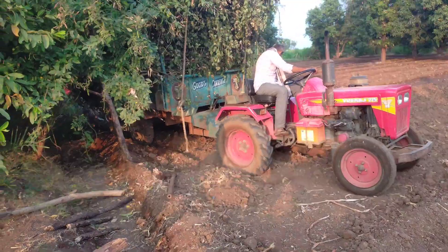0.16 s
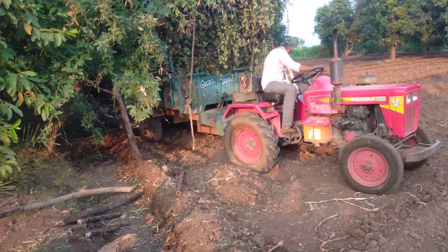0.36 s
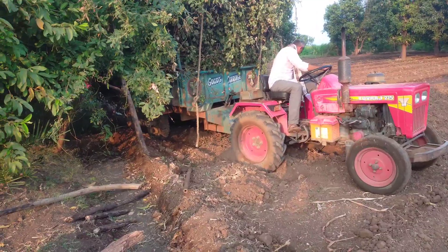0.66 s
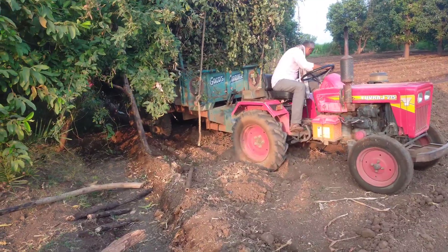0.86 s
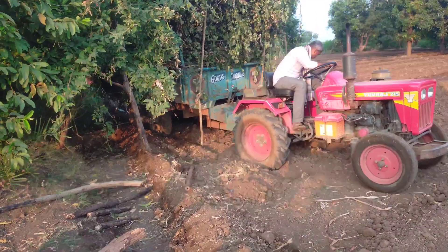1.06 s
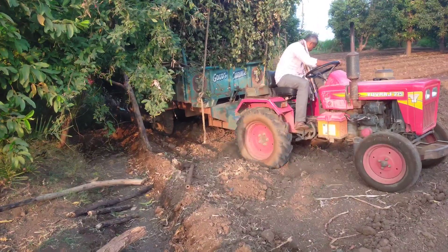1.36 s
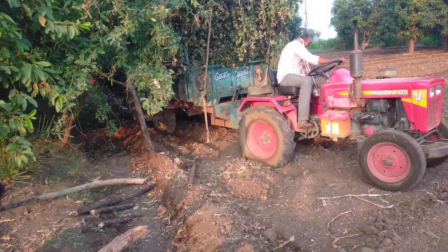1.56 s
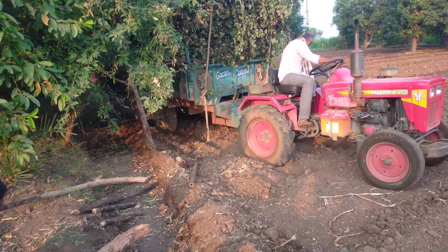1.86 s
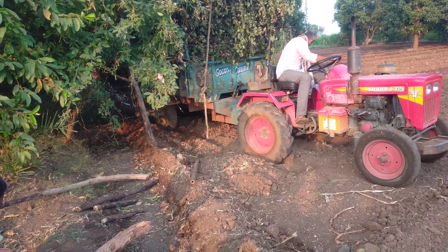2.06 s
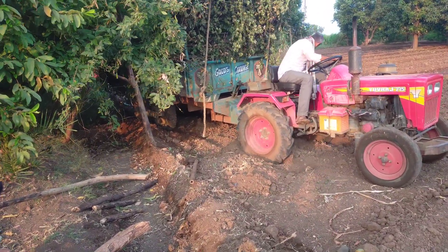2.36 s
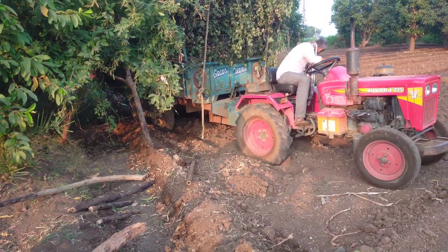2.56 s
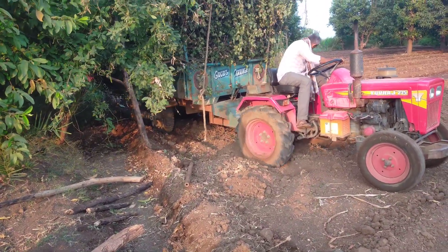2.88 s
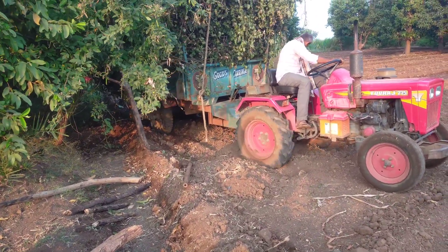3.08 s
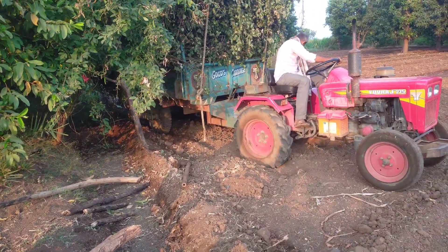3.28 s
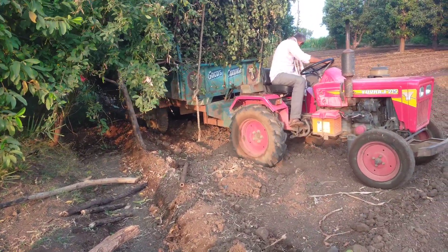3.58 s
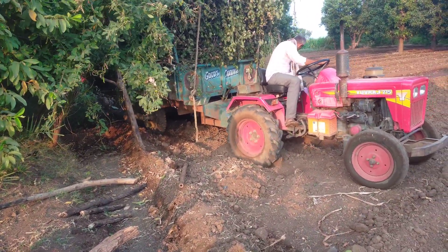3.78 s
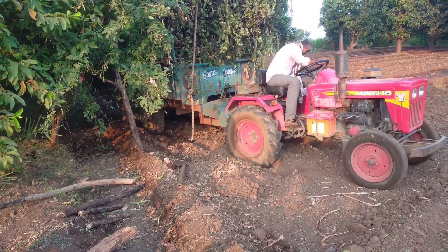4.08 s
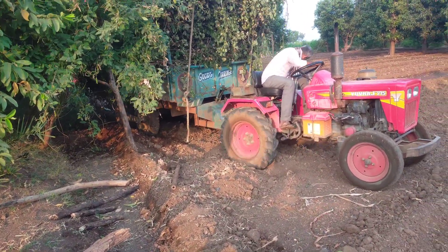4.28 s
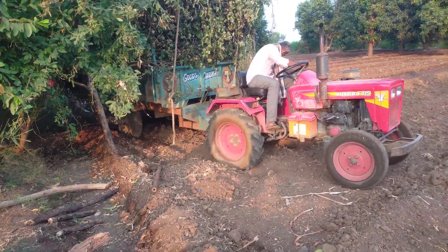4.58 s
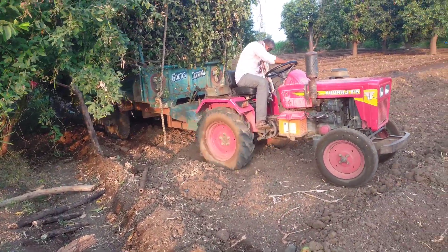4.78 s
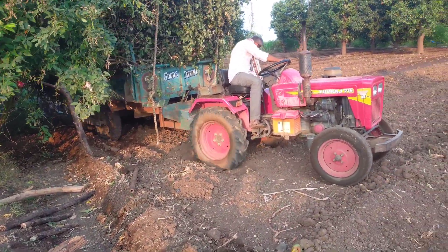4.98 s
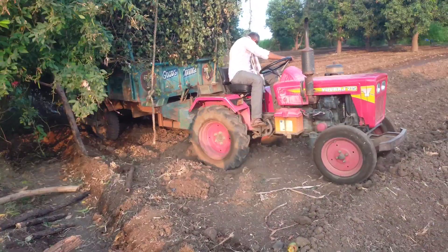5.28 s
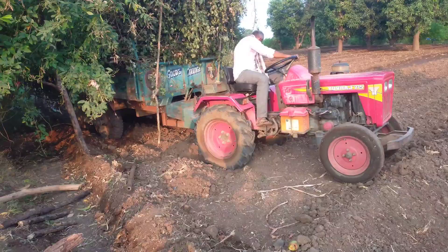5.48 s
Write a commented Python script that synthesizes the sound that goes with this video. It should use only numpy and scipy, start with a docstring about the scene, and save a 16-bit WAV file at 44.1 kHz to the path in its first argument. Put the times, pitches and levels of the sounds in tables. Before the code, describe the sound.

A single-cylinder diesel tractor is already pulling at the start, a few metres away outdoors, its exhaust barking about sixteen times a second with a raspy puff on each stroke. At 0.6 seconds the throttle closes and the engine coasts on weak, softer beats. It pulls again from about 1.2 to 2.1 seconds, eases, then pulls from 2.7 to 3.9 seconds, speeding up slightly as each burst ends. The fourth pull begins near 4.3 seconds and holds until the end, at about 5.6 seconds. Combustion knock, light valve ticking and the whirr of gears and fan continue underneath, swelling with the load, and the clatter is brightest late on. From about 4.5 seconds a rubbing part gives a faint, wavering squeal that rises in pitch and is clearest around 5.4 seconds. Nearby trees add a slight, short echo to the barks.

```python
"""A single-cylinder diesel tractor hauls a loaded trailer over soft soil, a few metres away by some trees.
It pulls in four bursts and coasts on weak strokes between them. Each exhaust pulse excites the
silencer's resonant modes as a bark, followed by a puff of turbulent gas. Combustion knock, piston and
valve impacts and the noise of gears and fan run underneath. The trees scatter each bark back,
and a rubbing part squeals faintly near the end."""
import sys
import numpy as np
from scipy import signal
from scipy.fft import rfft, irfft
from scipy.io import wavfile
from scipy.ndimage import uniform_filter1d

SR = 44100
rng = np.random.default_rng(int(sys.argv[2]) if len(sys.argv) > 2 else 0)


def generate_wav(sig):
    """Save sig (samples, or channels by samples) to the path in sys.argv[1] as 16-bit PCM at SR."""
    pcm = np.round(np.clip(np.atleast_2d(sig).T, -1, 1) * 32767).astype(np.int16)
    wavfile.write(sys.argv[1], SR, pcm)


N = 248724
TIME = np.arange(N) / SR
AGE = TIME[:3000]   # time since the onset of one transient [s]


def from_db(db):
    """Amplitude ratio of a level in decibels."""
    return 10 ** (np.asarray(db) / 20)


def unit_rms(x):
    """Normalisation to an rms of one."""
    return x / np.sqrt(np.mean(x ** 2) + 1e-20)


def in_time(rows):
    """Linear interpolation of a table's columns at every sample."""
    times, *columns = np.transpose(rows)
    return [np.interp(TIME, times, column) for column in columns]


def noise(spectrum):
    """Spectral shaping: white noise takes on a colour that falls steeply beyond its ends; rms 1."""
    hz, db = np.transpose(spectrum)
    f = np.maximum(np.arange(N // 2 + 1) * SR / N, 1)
    colour = from_db(np.interp(np.log(f), np.log(hz), db))
    band = 1 / np.sqrt((1 + (hz[0] / f / 2) ** 4) * (1 + (f / hz[-1] / 2) ** 8))
    rolloff = np.minimum(hz[-1] / f, 1) ** 2
    return unit_rms(irfft(rfft(rng.standard_normal(N)) * colour * band * rolloff, N))


def place(times, shapes):
    """Superposition of transients, one at each time."""
    span = len(AGE)
    out = np.zeros(N + 4 * span)
    for onset, shape in zip(times, shapes):
        at = span + round(onset * SR)
        out[at:at + span] += shape
    return out[span:span + N]


def puffs(times, level_db, rise_ms, sharpness):
    """Envelope of bursts that swell to their level and decay exponentially."""
    age = AGE * 1000 / rise_ms
    return place(times, np.outer(from_db(level_db), (age * np.exp(1 - age)) ** sharpness))


def tree_echoes(sound, t60_s, first_s, echo_db, low_hz):
    """Scattering: trunks, leaves and trailer return a spray of echoes; long waves pass them by."""
    t = TIME[:SR // 2]
    response = rng.standard_normal(len(t)) * from_db(-60 * t / t60_s) * (t > first_s)
    response /= np.sqrt(np.sum(response ** 2))
    scattered = signal.sosfilt(signal.butter(2, low_hz, "high", fs=SR, output="sos"), sound)
    return from_db(echo_db) * signal.fftconvolve(scattered, response)[:N]


# Friction tone: (time [s], frequency [Hz], fundamental level [dB], octave level [dB])
SQUEAL_TONE = [(4.4, 880, -83, -90), (4.55, 900, -54, -62), (4.82, 898, -46, -69), (5.25, 930, -51, -58),
               (5.35, 997, -41, -39), (5.455, 1030, -46, -44.5), (5.55, 1030, -63, -85)]

def squeal(waver):
    """Friction-induced vibration: a rubbing part sings unsteadily with its octave."""
    hz, fundamental_db, octave_db = in_time(SQUEAL_TONE)
    unsteady = unit_rms(uniform_filter1d(rng.standard_normal(N), size=500))
    phase = 2 * np.pi * np.cumsum(hz * (1 + waver * unsteady)) / SR
    return from_db(fundamental_db) * np.sin(phase) + from_db(octave_db) * np.sin(2 * phase)


# Noise of block, gears and fan: (frequency [Hz], relative spectral level [dB])
RUNNING_SPECTRUM = [(30, -22), (55, -27), (80, -5.5), (112, 3.5), (220, 6), (330, -1), (480, 1.5),
                    (640, -9.5), (1080, 2), (1300, -0.5), (1750, -9.5), (2250, -7), (3000, -9.5),
                    (4000, -25), (15000, -44)]
# Modes of panels and casings: (frequency [Hz], bandwidth [Hz], level [dB])
PANEL_MODES = [(151, 14, -63), (345.5, 11, -60), (2190, 280, -52.5)]

def running_noise(strain, idle_db, load_db):
    """Forced vibration: machine noise grows with the load and keeps the panels ringing."""
    running = from_db(idle_db + load_db * strain) * noise(RUNNING_SPECTRUM)
    drone = np.zeros(N)
    for hz, width_hz, db in PANEL_MODES:
        ring = signal.lfilter(*signal.iirpeak(hz, hz / width_hz, fs=SR), running)
        drone += from_db(db) * unit_rms(ring)
    return running + drone


# Combustion knock in the block: (frequency [Hz], relative spectral level [dB])
KNOCK_SPECTRUM = [(300, -25), (700, 4.5), (1200, 7), (1700, -0.5), (2300, 10), (3100, -2.5), (4200, -23)]

def knock(times, thump_db, lead_s):
    """Impulsive excitation: ignition jolts the block before the exhaust opens, more on strong strokes."""
    level_db = -38 + 1.2 * (thump_db - FULL_THUMP_DB)
    return noise(KNOCK_SPECTRUM) * puffs(times - lead_s, level_db, rise_ms=2.7, sharpness=0.43)


# Clatter of piston and valve gear: (frequency [Hz], relative spectral level [dB])
CLATTER_SPECTRUM = [(1000, -41), (3000, 15.5), (4200, -10), (4850, 10), (5700, -31), (7600, 2.5),
                    (10200, -5), (12000, -18), (15500, -6)]
# Impacts in each cycle: (delay after the exhaust opens [ms], relative level [dB], rise time [ms])
IMPACTS = [(2, -66.5, 1.6), (7, -65, 4.8)]
# Ring of the valve gear: (frequency [Hz], relative spectral level [dB])
VALVE_SPECTRUM = [(4100, -20), (4600, -17), (4800, 12), (5050, 8), (5600, -22)]
# Slow swell of clatter and valve ticks: (time [s], gain [dB])
CLATTER_GAIN = [(0.0, -6.5), (1.9, 5.5), (3.2, -1.5), (4.5, 5), (5.5, 10.5)]

def clatter(firings, times, strain):
    """Impact noise: piston and valve gear strike in every cycle, adding in power to a faint whirr."""
    impact_power = sum(puffs(times + ms / 1000, db + rng.normal(0, 1, len(times)), rise_ms, 1) ** 2
                       for ms, db, rise_ms in IMPACTS)
    whirr = from_db(-84 + 11 * strain)
    rattle = noise(CLATTER_SPECTRUM) * np.sqrt(impact_power * from_db(8) + whirr ** 2)
    seatings = firings + 0.0336   # a valve seats about half a cycle after the exhaust opens
    valve_ring = noise(VALVE_SPECTRUM)
    ticks = puffs(seatings, -69.5 + rng.normal(0, 3.1, len(times)), rise_ms=1.9, sharpness=0.95)
    gain_db, = in_time(CLATTER_GAIN)
    return from_db(gain_db) * (rattle + valve_ring * ticks)


# Engine speed, racing as a pull ends and sinking in each coast: (time [s], firing rate [Hz])
ENGINE_SPEED = [(0.0, 16.341), (0.31, 16.354), (0.61, 18.217), (1.04, 16.926), (1.18, 15.567),
                (1.86, 15.802), (2.07, 17.194), (2.51, 16.321), (2.74, 14.666), (3.5, 14.887),
                (3.85, 17.476), (3.92, 16.931), (4.34, 15.589), (4.98, 15.38), (5.64, 15.323)]

def firing_times(first_s):
    """Phase is the integral of rate: the exhaust opens once in each completed cycle."""
    rate_hz, = in_time(ENGINE_SPEED)
    cycles = np.cumsum(rate_hz) / SR
    openings = np.arange(np.interp(first_s, TIME, cycles), cycles[-1], 1)
    return np.interp(openings, cycles, TIME)


def settle(elapsed_s, time_constant_s):
    """First-order step response, rising from 0 towards 1."""
    return 1 - np.exp(-np.maximum(elapsed_s, 0) / time_constant_s)


# Throttle pulls: (fuel on [s], fuel off [s], easing time [s], bark drive [dB], rasp drive [dB])
THROTTLE_PULLS = [(-0.25, 0.611, 0.013, -23.5, -31.5), (1.173, 2.144, 0.09, -23, -30),
                  (2.667, 3.854, 0.013, -24.5, -31.5), (4.26, 6.0, 0.03, -22, -30)]

def throttle(fuel_rise_s, strain_rise_s, strain_fall_s):
    """First-order lag: fuel comes on, holds and eases off; strain on the drive trails it. Both 0-1."""
    fuel, strain = np.zeros((2, N))
    for on, off, ease_s, _, _ in THROTTLE_PULLS:
        fuel += settle(TIME - on, fuel_rise_s) * settle(off - TIME, ease_s)
        strain += settle(TIME - on, strain_rise_s) * (1 - settle(TIME - off, strain_fall_s))
    return fuel, strain


# Firings that bark harder: (time [s], bark change [dB], rasp change [dB])
ACCENTS = [(0.25, 4.5, -2.5), (0.43, 4.0, -0.5), (0.49, 2, 3.5), (0.54, 3, 1.5), (1.37, 1.5, 2.5),
           (1.44, 1.5, -1), (1.69, 1, 4), (3.21, 2.5, -2), (3.73, 5, 0.5), (4.6, 3.5, 0), (4.86, 2, 1.5),
           (4.92, 3, 2)]
FULL_THUMP_DB = -25   # thump drive at full fuel

def stroke_levels(times, fuel, strain, coast_db, scatter_db):
    """Power laws: fuel raises the drive [dB] of low thump and, more steeply, mid bark and high rasp."""
    on, _, _, pull_bark_db, pull_rasp_db = np.transpose(THROTTLE_PULLS)
    pull = np.searchsorted(on, times) - 1
    slack = 1 - strain   # until the strain builds: a little more bark, less rasp
    bark_db = pull_bark_db[pull] + slack
    rasp_db = pull_rasp_db[pull] - 5 * slack
    for accent_s, bark_change_db, rasp_change_db in ACCENTS:
        nearest = np.argmin(abs(times - accent_s))
        bark_db[nearest] += bark_change_db
        rasp_db[nearest] += rasp_change_db
    thump = from_db(FULL_THUMP_DB) * fuel ** 0.84
    bark = from_db(bark_db) * fuel ** 1.43
    rasp = from_db(rasp_db) * fuel ** 1.48
    drive = np.hypot(np.transpose([thump, bark, rasp]), from_db(coast_db))
    chance_db = rng.standard_normal((len(times), 3)) * scatter_db
    return (20 * np.log10(drive) + chance_db).T


# Turbulence in the stack: (frequency [Hz], relative spectral level [dB])
STACK_SPECTRUM = [(250, -6), (500, -2), (820, 1), (1080, 18.5), (1500, -3), (2400, 8), (3100, 2.5),
                  (3600, -5), (4200, -19.5)]
# Jet at the stack's mouth: (frequency [Hz], relative spectral level [dB])
JET_SPECTRUM = [(2500, 12), (4000, -17), (5000, 3.5), (5900, -4), (6800, 0), (7700, 0), (8600, 2),
                (9600, 3), (10400, 4), (11300, -9), (13500, -8), (14600, -8), (15500, -7)]

def gas_flow(times, thump_db, rasp_db):
    """Turbulent flow noise: gas rushes up the stack behind each pulse and leaves as a bright spit."""
    force_db = (thump_db + rasp_db) / 2
    rush = noise(STACK_SPECTRUM) * puffs(times + 0.00033, rasp_db + 3, rise_ms=4.18, sharpness=1.77)
    spit_db = force_db - 12.5 + rng.normal(0, 1.3, len(times))
    spit = puffs(times + 0.00048, spit_db, rise_ms=1.29, sharpness=1)
    fizzle = puffs(times + 0.0012, force_db - 22.5, rise_ms=3, sharpness=0.33)
    return rush + noise(JET_SPECTRUM) * np.hypot(spit, fizzle)


# Modes of silencer and stack: (frequency [Hz], bandwidth [Hz], relative level [dB], onset offset [ms])
SILENCER_MODES = [(83.7, 29, -26, 0.78), (100, 44, -9.5, -0.51), (237.5, 125.5, -0.26, 0.036),
                  (566, 115, -5.8, 1.474), (735, 97, -14.5, 0.88), (1048.4, 166, -0.64, 0.2),
                  (1290, 120, -10, 1.27), (1638, 110, -6, 0.91), (2247, 206, -7, 0.445),
                  (2869, 158, -5.5, 0.863)]

def exhaust(times, thump_db, bark_db, rasp_db, pumping_db, wander, scatter_db):
    """Coupled resonators: each blow-down briefly rings the silencer's chambers; high modes vary most."""
    out = np.zeros(N)
    deep_db = np.maximum(thump_db, pumping_db)   # even unfuelled, the piston pumps the deepest modes
    for k, (hz, width_hz, mode_db, offset_ms) in enumerate(SILENCER_MODES):
        spread = min(hz / 1500, 1.5) ** 2
        pitch_chance, level_chance = spread * rng.standard_normal((len(times), 2)).T
        drive_db = deep_db if hz < 170 else thump_db if hz < 650 else bark_db if hz < 1500 else rasp_db
        # energy passes between two chambers, so the ring swells and then stops short
        beat = np.pi * width_hz / np.sqrt(2) * AGE
        envelope = np.exp(-beat) * np.sin(beat)
        ring = envelope * np.sin(2 * np.pi * hz * np.outer(1 + wander * pitch_chance, AGE))
        strength = np.sqrt(width_hz / 3.86) * from_db(drive_db + mode_db + scatter_db * level_chance)
        out += (-1) ** k * place(times + offset_ms / 1000, ring * strength[:, None])
    return signal.sosfilt(signal.butter(6, 3500, fs=SR, output="sos"), out)


def scene():
    """Superposition: the throttle-driven exhaust and its echoes sound over the running machine."""
    firings = firing_times(first_s=0.0043)
    fuel, strain = throttle(fuel_rise_s=0.044, strain_rise_s=0.12, strain_fall_s=0.092)
    charge = np.interp(firings, TIME, fuel)
    load = np.interp(firings, TIME, strain)
    times = firings + 0.012 * (charge < 0.05)   # coasting strokes lag: the piston must push the gas out
    thump_db, bark_db, rasp_db = stroke_levels(
        times, charge, load, coast_db=(-48, -46, -51.5), scatter_db=(1.12, 0.1, 0.5))
    stack = exhaust(times, thump_db, bark_db, rasp_db, pumping_db=-39, wander=0.025, scatter_db=1)
    stack += gas_flow(times, thump_db, rasp_db)
    echoes = tree_echoes(stack, t60_s=0.33, first_s=0.013, echo_db=-20.5, low_hz=217)
    machine = running_noise(strain, idle_db=-48, load_db=6)
    machine += knock(times, thump_db, lead_s=0.0135)
    machine += clatter(firings, times, strain)
    return (echoes + squeal(waver=0.0016) + machine + stack)[None]


def record(dry):
    """Frequency response: a small microphone thins the deep bass and notches the treble; the top is cut."""
    thin = signal.sosfilt(signal.butter(2, 50, "high", fs=SR, output="sos"), dry)
    dipped = signal.lfilter(*signal.iirnotch(7900, 45, fs=SR), thin)
    return signal.sosfilt(signal.ellip(10, 0.2, 70, 15750, fs=SR, output="sos"), dipped)


dry = scene()
out = record(dry)
generate_wav(out)
```